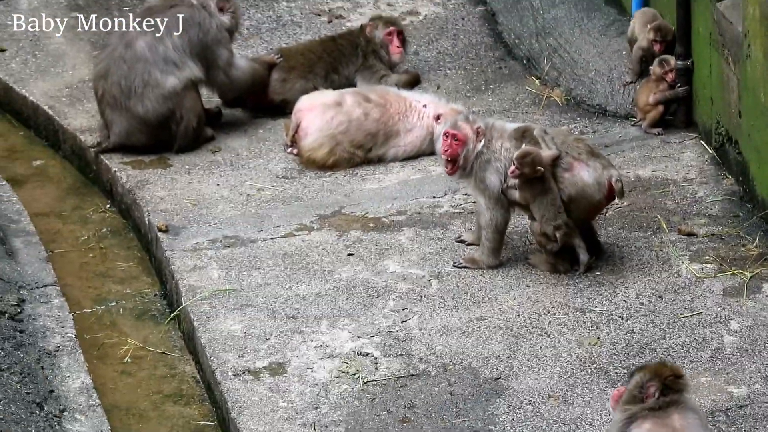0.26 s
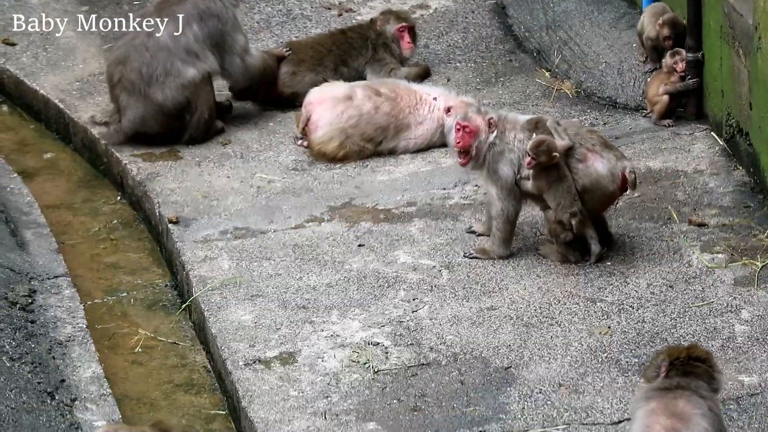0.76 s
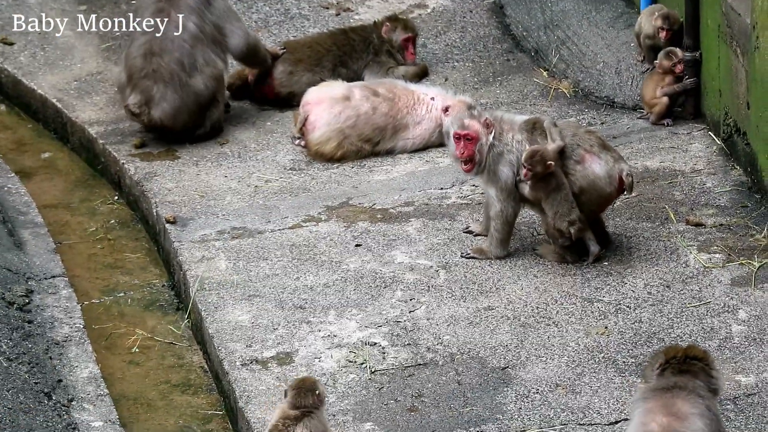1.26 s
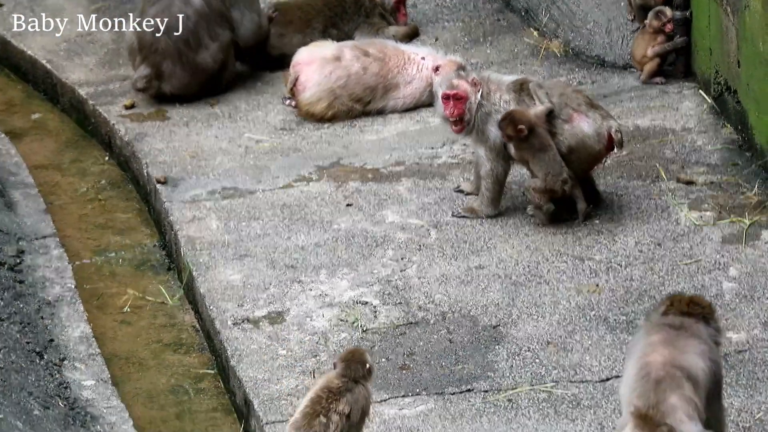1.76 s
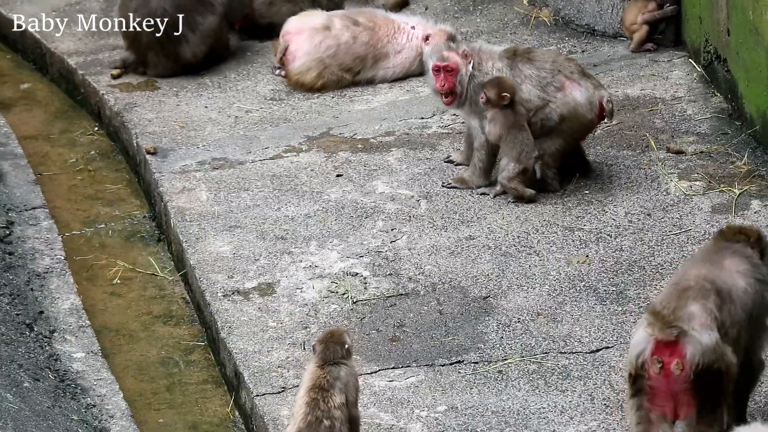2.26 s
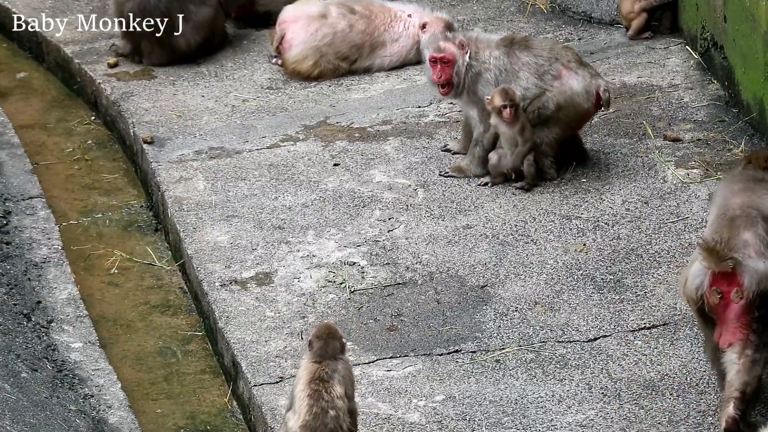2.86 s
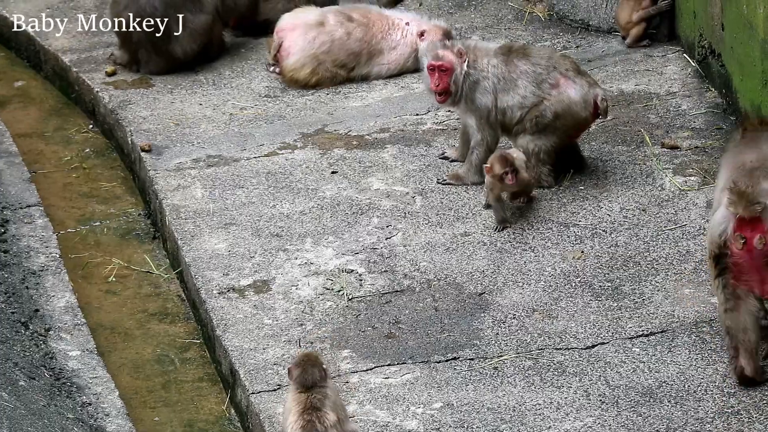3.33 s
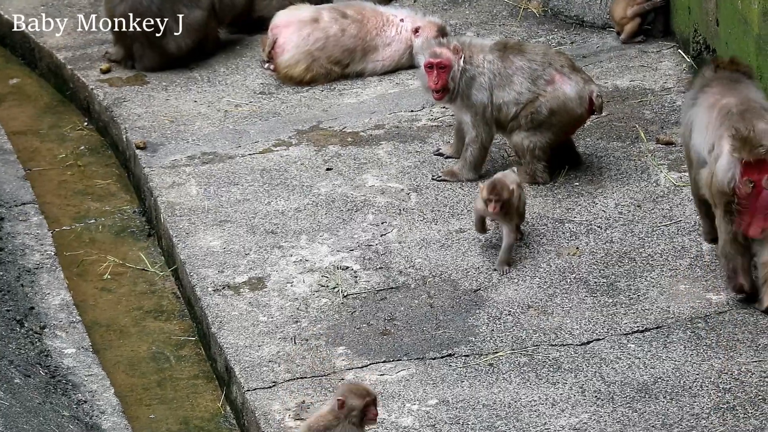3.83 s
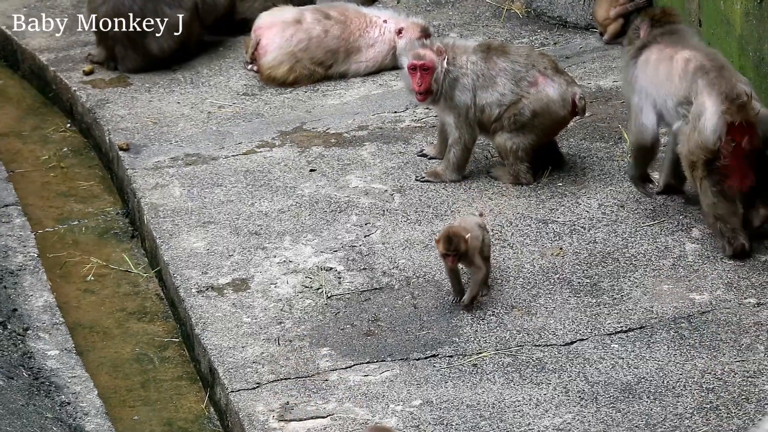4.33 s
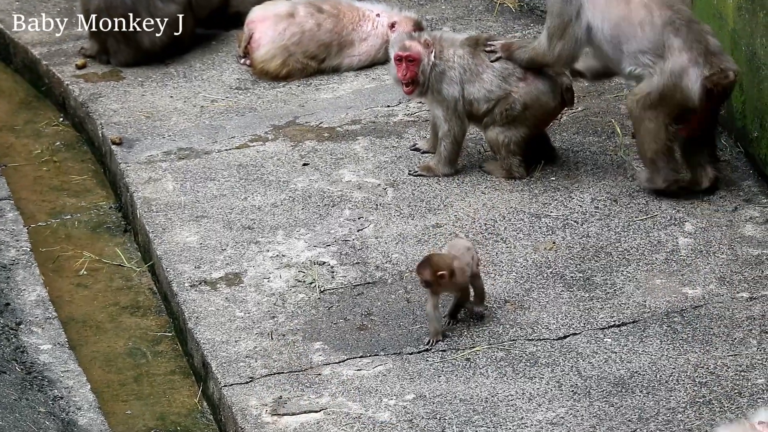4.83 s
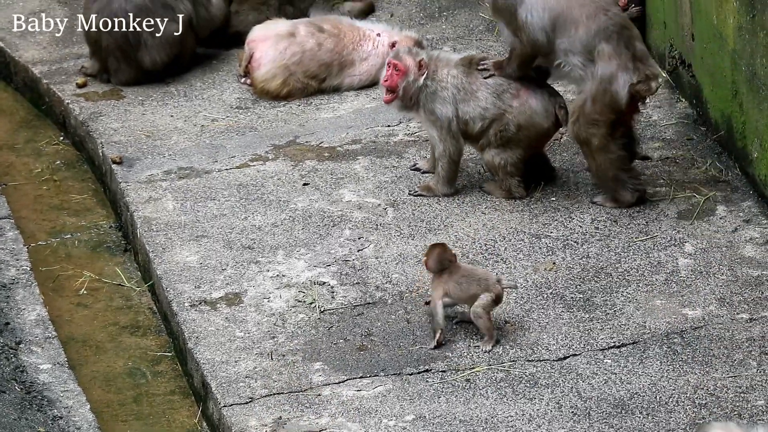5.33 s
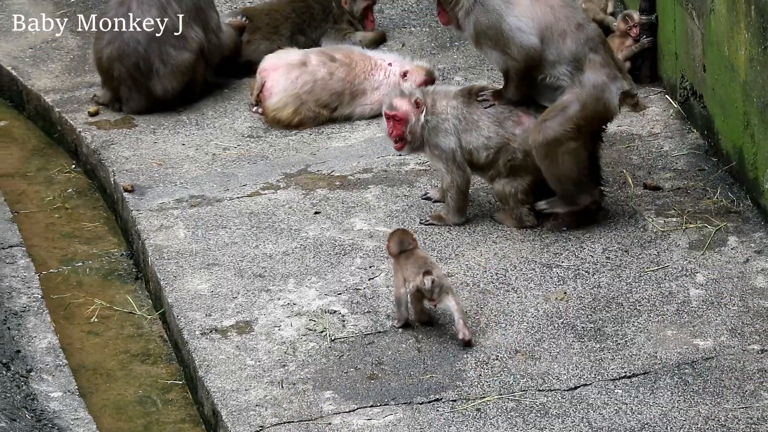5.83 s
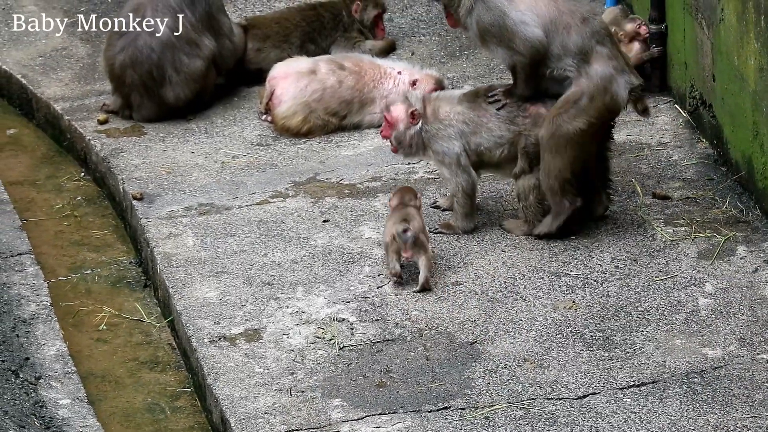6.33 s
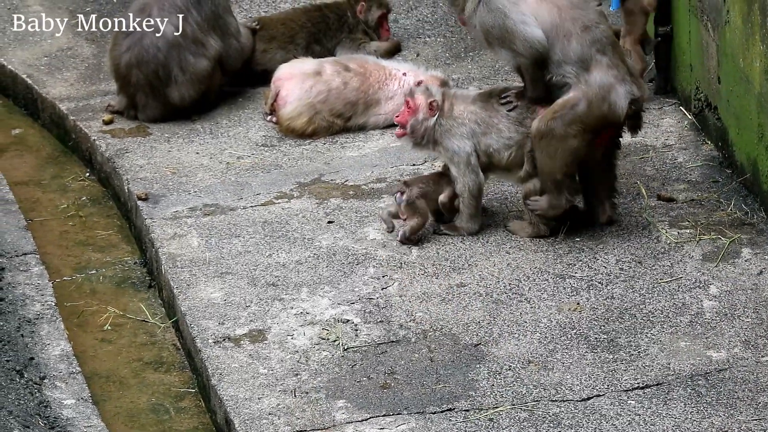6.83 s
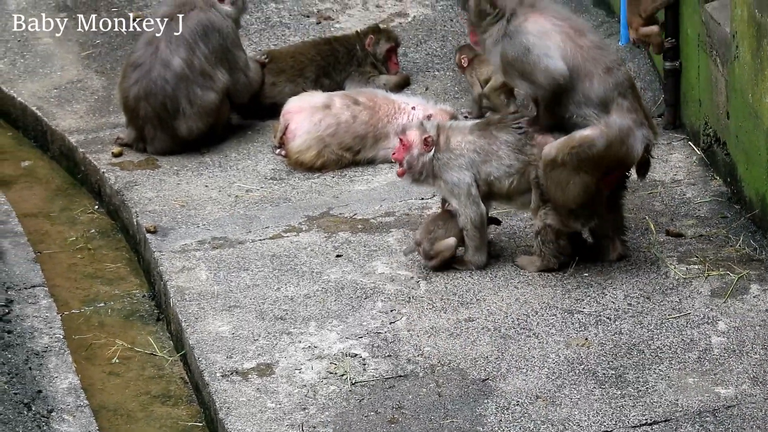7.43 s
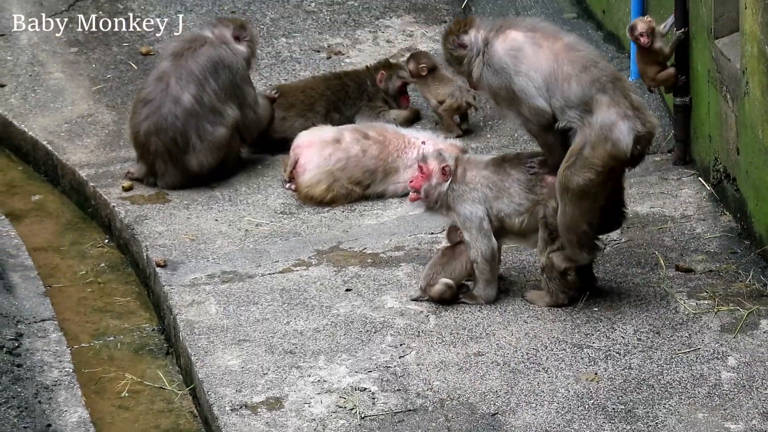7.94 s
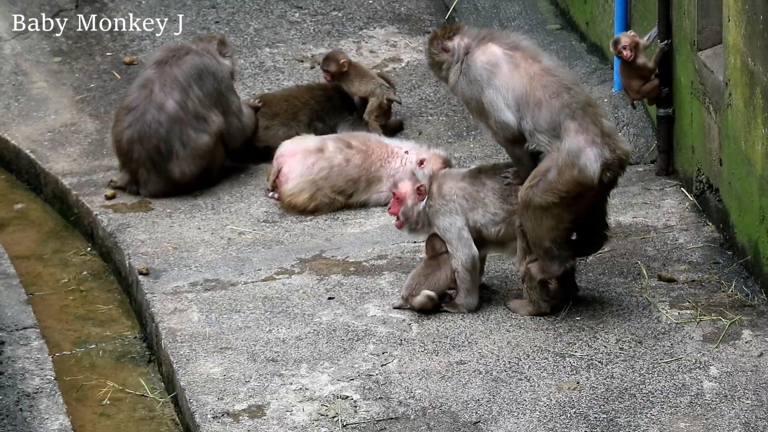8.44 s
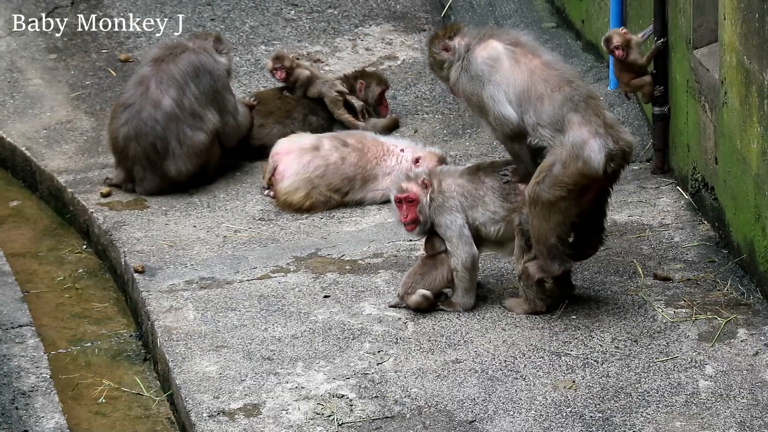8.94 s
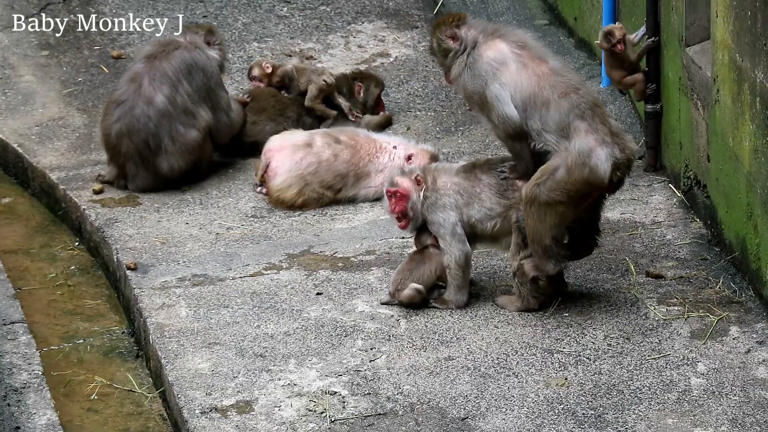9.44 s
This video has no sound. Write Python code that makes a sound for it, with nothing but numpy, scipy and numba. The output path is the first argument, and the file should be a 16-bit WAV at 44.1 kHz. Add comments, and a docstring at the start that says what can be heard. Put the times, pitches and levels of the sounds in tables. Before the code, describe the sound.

A monkey gives two long, breathy screams while a young one squeals thinly over them. After a pause with faint bird peeps, another monkey wails twice, then barks in short rough bursts until the end. Cicadas hiss steadily behind, with faint far coos and low wind. The calls are heard in stereo from the rim of an outdoor concrete pit, with a short echo off the walls.

```python
"""A concrete pit with macaques, heard from the rim through a pair of microphones.
One screams twice while a young one squeals over it; another wails, then barks in short rough bursts.
Screams, wails and barks are vocal-fold pulses and breath ringing in the chest, throat and mouth;
the squeals are thin, wavering tones. The walls give a short echo. Behind them are far coos, peeping
birds, scuffing feet, cicadas hissing in the trees, low wind and a machine humming far off."""
import sys
import numpy as np
from scipy import signal
from scipy.fft import rfft, irfft
from scipy.io import wavfile
from scipy.ndimage import uniform_filter1d
from numba import njit

SR = 44100
rng = np.random.default_rng(int(sys.argv[2]) if len(sys.argv) > 2 else 0)


def wav_record(signal):
    """Record a signal, one row per channel, as 16-bit PCM in the file named by sys.argv[1]."""
    frames = np.transpose(np.atleast_2d(signal))
    bounded = np.clip(frames, -1, 1)
    # unit amplitude maps onto the largest positive 16-bit level
    quanta = np.round(bounded * 32767).astype(np.int16)
    wavfile.write(sys.argv[1], SR, quanta)


N = 427319
T = np.arange(N) / SR

# One list per scream; the throat is relative to the mouth.
# (time [s], pitch [Hz], level [dB], mouth resonance [Hz], throat [dB])
SCREAM_SHAPES = [
    [(0.0, 284.7, -26.5, 1860, -44), (0.04, 284.4, -23.5, 1950, -26), (0.11, 292, -29, 1950, -21.5),
     (0.3, 297.2, -36, 1890, -17), (0.37, 316.8, -33, 1985, -21), (.52, 326.3, -39, 2000, -25),
     (.59, 335, -30, 1980, -32), (.68, 322.5, -38, 1950, -28), (0.712, 291.6, -30, 1910, -30),
     (.752, 292.5, -24.5, 1910, -24), (0.79, 275.7, -28, 1890, -18), (0.835, 260, -30, 1920, -11),
     (0.87, 198.5, -69, 1880, 9)],
    [(1.385, 305, -50, 1502, -8), (1.43, 319.3, -31, 1754, -33), (1.53, 324, -30, 1926, -25),
     (1.6, 312, -25.5, 1970, -28), (1.66, 309.6, -24.5, 1940, -21.5), (1.814, 291.7, -21.5, 1898, -22.5),
     (1.87, 286.7, -20.5, 1951, -23), (1.92, 278.4, -22, 1857, -25), (1.985, 266.4, -24, 1870, -11),
     (2.06, 180.5, -53.5, 1805, 3)],
]
# How raspy the screams are: (time [s], roughness [0-1])
SCREAM_RASP = [(0, .08), (.08, .1), (.12, .2), (.3, .16), (.36, .08), (.58, .07), (.63, .3), (.7, .25),
               (.72, .06), (.79, .1), (.86, .45), (1.4, .6), (1.55, .45), (1.6, .12), (1.68, .06),
               (1.93, .06), (1.97, .55)]
# Ringing gaps at the teeth: (centre [Hz], width [Hz], first scream [dB], second scream [dB])
SCREAM_GAPS = [(2630, 280, 1.5, 1.5), (3620, 170, 0.5, 2), (4670, 360, 5, 0.5), (5480, 540, -1.5, 7.5)]
# The teeth ring weaker in the second scream, the head turned another way: (teeth [dB], change with level [dB
# per dB])
SCREAM_TEETH_LEVELS = [(-8, -0.47), (-12, -0.13)]
def screams():
    """Two long, breathy screams; with effort, chest and teeth grow less than the mouth."""
    calls = [[(s, hz, db, mouth, throat, by_effort(db, -40, -1), by_effort(db, *lips), 0)
              for s, hz, db, mouth, throat in call] for call, lips in zip(SCREAM_SHAPES, SCREAM_TEETH_LEVELS)]
    before_second = T < SCREAM_SHAPES[1][0][0]
    gaps = [(hz, width, np.where(before_second, first, second))
            for hz, width, first, second in SCREAM_GAPS]
    return voice(calls, SCREAM_RASP, gaps, throat_hz=859, mouth_width_hz=282,
                 flutter=0.00459, wander=0.0393, jitter=0.1561, shimmer=0.3,
                 throb_db=3, breath_db=13, fill_db=-10.5, whoosh_db=-2.5)


# One list per call; the teeth are relative to the mouth.
# (time [s], pitch [Hz], level [dB], mouth resonance [Hz], teeth [dB])
WAIL_SHAPES = [
    [(4.675, 777, -40, 1470, -6), (4.693, 741, -20, 1540, -15), (4.703, 693, -22, 1580, -10),
     (4.719, 729, -20.5, 1550, -5.5), (4.733, 799, -14, 1640, -18), (4.749, 710, -24.5, 1550, -14),
     (4.759, 763, -18.5, 1540, -6.5), (4.772, 753, -18, 1580, -15), (4.783, 694, -23.5, 1570, -7),
     (4.797, 689, -19, 1580, -21), (4.803, 674, -30, 1500, -13), (4.822, 673, -46, 1450, -14)],
    [(5.035, 641.5, -29, 1732, -7), (5.061, 708, -27.5, 1730, -8), (5.081, 668, -24.5, 1712, -9),
     (5.101, 777.5, -29.5, 1560, 2), (5.123, 756, -36.5, 1590, 9.5), (5.155, 783, -38.5, 1710, 8.5),
     (5.18, 738, -35, 1750, 7), (5.207, 762, -39.5, 1730, 11), (5.215, 795, -28, 1750, -7),
     (5.226, 938, -23.5, 1840, -11), (5.245, 897, -25.5, 1800, -23), (5.267, 884, -29, 1702, -30),
     (5.285, 865, -38, 1348, -16), (5.295, 920, -41, 950, -14), (5.32, 876, -45.5, 901, -12)],
    [(7.391, 769, -23, 1619, -11), (7.403, 781, -16, 1644, -10.5), (7.418, 800, -18, 1692, -7.5),
     (7.431, 761, -19.5, 1610, -9.5), (7.44, 737, -27, 1595, -18)],
]
# How raspy the wails are: (time [s], roughness [0-1])
WAIL_RASP = [(4.66, .1), (4.735, .12), (4.75, .28), (4.83, .4), (5.03, .22), (5.055, .2), (5.065, .4),
             (5.08, .15), (5.1, .12), (5.21, .13), (5.23, .3), (5.25, .45), (5.33, .3), (7.39, .25),
             (7.44, .35)]
# Ringing gaps at the teeth: (centre [Hz], width [Hz], level [dB])
WAIL_GAPS = [(2360, 320, 2.5), (3090, 490, -19), (3840, 520, 11.5), (4600, 150, 8), (5400, 670, 2.5)]
# How bright the teeth sound in each call: (tilt [dB per octave])
WAIL_BRIGHTNESS = [-3.5, 4, -9]
def wails():
    """Two high wails and a yelp from fast, unevenly beating vocal folds."""
    calls = [[(s, hz, db, mouth, by_effort(db, -14.5, -0.05), by_effort(db, -42.5, -2.5), teeth, tilt)
              for s, hz, db, mouth, teeth in call] for call, tilt in zip(WAIL_SHAPES, WAIL_BRIGHTNESS)]
    return voice(calls, WAIL_RASP, WAIL_GAPS, throat_hz=795, mouth_width_hz=397,
                 flutter=0.005, wander=0.03, jitter=0.33, shimmer=1,
                 throb_db=1.5, breath_db=10, fill_db=-11, whoosh_db=-30)


# One row per bark: (start [s], swell [s], held [s], first level [dB], last level [dB],
# mouth resonance [Hz], throat [dB], final chest [dB], teeth [dB], teeth tilt [dB per octave])
BARK_SHAPES = [(5.671, 0.0041, 0.078, -24.5, -24, 1687, -8, -27, -4, 23),
               (5.987, 0.0037, 0.039, -20.5, -21, 1650, -9.5, -53, -6, 2),
               (6.033, .0015, 0.043, -18, -20, 1750, -8, -27, -6.5, -6),
               (6.078, 0.0034, 0.038, -23.5, -29, 1560, -6.5, -10, -5.5, -7),
               (6.330, 0.003, 0.03, -23, -26, 1740, -8.5, -18, -2.5, -7),
               (6.379, 0.002, .068, -21.5, -24.5, 1690, -11, -8.5, -9, -11),
               (6.732, 0.004, 0.034, -34, -36, 1780, -5.5, -10, -8, -3),
               (7.111, 0.004, 0.07, -22, -23.5, 1730, -12, -16, -13, 3),
               (7.436, 0.004, 0.056, -20, -26, 1630, -8, -26, -7.5, -6),
               (7.713, 0.0015, 0.068, -23.5, -26, 1644, -12, -17.5, -12.5, 3),
               (8.174, 0.002, 0.058, -26, -22, 1618, -10.5, -15.5, -10, 2),
               (8.457, 0.022, 0.078, -19.5, -27.5, 1676, -7, -6.5, -6.5, -3),
               (9.533, 0.0037, 0.063, -21.5, -23, 1509, -8, -14, -6.5, -3)]
# How raspy the barks are: (time [s], roughness [0-1])
BARK_RASP = [(6.3, .36), (6.4, .31)]
# Ringing gaps at the teeth: (centre [Hz], width [Hz], level [dB])
BARK_GAPS = [(2520, 220, 5.5), (3100, 330, -2.9), (3940, 400, 3), (4236, 330, 3)]
def barks():
    """The jaws snap open, then the mouth closes and the throat comes up. A new bark cuts off the last."""
    bite_s, bite_db, release_s, tense_hz = 0.018, 3, 0.03, 298.9
    next_starts = [bark[0] for bark in BARK_SHAPES[1:]] + [T[-1]]
    calls = []
    for bark, cut in zip(BARK_SHAPES, next_starts):
        s, swell, held, first, last, mouth, throat, chest, teeth, tilt = bark
        opened = (mouth, throat - 1.5, -29, teeth, tilt)  # the chest starts faint
        closed = (mouth * 0.86, throat + 1.5, chest, teeth - 4, tilt)
        stages, *columns = np.transpose([
            (s, first - 5, *opened),
            (s + swell, first, *opened),
            (min(s + held, cut), last, *closed),
            (min(s + held + release_s, cut), last - 19, *closed)])
        times = np.sort(np.append(stages, s + bite_s))
        db, *body, teeth_db, tilt_db = (np.interp(times, stages, c) for c in columns)
        teeth_db += bite_db * np.maximum(1 - (times - s) / bite_s, 0)  # the teeth flare at the snap
        hz = tense_hz * undb(0.15 * np.minimum(db + 27, 0))  # the folds slacken below -27 dB
        calls.append(np.transpose([times, hz, db, *body, teeth_db, tilt_db]))
    return voice(calls, BARK_RASP, BARK_GAPS, throat_hz=837, mouth_width_hz=322,
                 flutter=0.01, wander=0.1, jitter=0.3, shimmer=0.86,
                 throb_db=2.5, breath_db=5, fill_db=-9, whoosh_db=3)


def by_effort(db, base_db, slope):
    """A strength that is base_db when the call is at -27 dB and shifts by slope for each dB more."""
    return base_db + slope * (db + 27)


def voice(calls, rasp, gaps, throat_hz, mouth_width_hz, flutter, wander, jitter, shimmer,
          throb_db, breath_db, fill_db, whoosh_db):
    """Vocal-fold pulses and rushing breath ring in the mouth, throat, chest and gaps at the teeth."""
    (hz, db, mouth_hz, throat_db, chest_db, teeth_db, tilt_db), gate = follow(calls)
    rough = np.interp(T, *np.transpose(rasp))
    hz = hz * (1 + (flutter + wander * rough) * drift(70))  # tense folds never hold a pitch
    chance = rng.standard_normal((N // 30, 2))
    pulses = even(vocal_folds(hz, jitter * rough ** 2, shimmer * rough, chance))
    air = pulses + rough * undb(breath_db) * rng.standard_normal(N)
    mouth = even(band_pass(ring(air, mouth_hz, mouth_width_hz), mouth_hz, 2.83 * mouth_width_hz))
    throat = undb(throat_db) * even(ring(air, throat_hz * (1 + 0.12 * rough * drift(25)), width_hz=111))
    chest = undb(chest_db) * even(ring(air, np.clip(hz, 150, 300), width_hz=196))
    jet = air + undb(whoosh_db) * rng.standard_normal(N)  # air hisses past the teeth
    gap_rings = sum((-1) ** k * undb(gap_db + tilt_db * np.log2(centre / 3500)) * ring(jet, centre, width)
                    for k, (centre, width, gap_db) in enumerate(gaps))
    teeth = undb(teeth_db) * even(gap_rings)
    fill = undb(fill_db) * even(ring(jet, 2330, width_hz=1470))  # between the resonances
    loudness = undb(db + throb_db * np.sqrt(rough) * drift(110))
    return (mouth - throat + chest - teeth + fill) * loudness * gate


@njit
def vocal_folds(hz, jitter, shimmer, chance):
    """A pulse each time the folds close; jitter varies the spacing and shimmer the size."""
    pulses, phase, cycle = np.zeros(len(hz) + 1), 0., 0
    for i in range(len(hz)):
        step = hz[i] * np.exp(jitter[i] * chance[cycle, 0]) / SR
        phase += step
        if phase >= 1:
            phase, cycle = phase - 1, cycle + 1
            size = np.exp(shimmer[i] * chance[cycle, 1])
            pulses[i] += size * phase / step  # shared between two samples
            pulses[i + 1] += size * (1 - phase / step)
    return pulses[:-1]


# The young one's notes: (start [s], swell [s], loud until [s after start], length [s],
# first pitch [Hz], last pitch [Hz], level [dB], hoarse air [dB], split [0-1])
SQUEAL_NOTES = [(0.48, 0.024, 0.039, 0.04, 2600, 2580, -27.5, -35, 0.86),
                (.518, .006, 0.03, 0.028, 2982, 2876, -30.5, -43, .6),
                (.548, 0.009, 0.04, 0.036, 2900, 2970, -28, -34, 0.64),
                (0.591, .006, 0.038, 0.0374, 2776, 2760, -19, -45, 0.18),
                (0.632, 0.011, 0.044, 0.0637, 2844, 2735, -23, -41, 0.24),
                (1.614, 0.022, 0.046, 0.039, 2900, 3064, -31, -38, 0.85),
                (1.662, .008, 0.043, 0.046, 2975, 3112, -21.5, -46, 0.17),
                (1.708, 0.0055, 0.05, .048, 3078, 3000, -31, -41, .9),
                (1.754, 0.0054, 0.038, 0.041, 2950, 2810, -25, -52, 0.22),
                (2.484, .004, 0.025, .026, 2715, 2732, -26.5, -48, 0.04),
                (2.509, .012, .022, .045, 2800, 3010, -24.5, -58, .05),
                (2.552, .005, 0.053, 0.054, 3400, 3380, -37, -39, 0.84),
                (2.603, .012, 0.025, 0.085, 3074, 3070, -25.5, -47, 0.02),
                (2.701, 0.0068, .042, 0.044, 2900, 2816, -29, -52, .05)]
def squeals():
    """Each note glides, swells, holds and dies; its hoarse air swells and fades more gently."""
    notes = []
    for s, swell, loud, length, first_hz, last_hz, db, air, split in SQUEAL_NOTES:
        stages = (0, -6, -1), (swell, 0, 0), (loud, 0, 0), (length, -13, -9)
        notes.append([(s + at, first_hz + (last_hz - first_hz) * at / length,
                       db + tone_db, air + air_db - db - tone_db, split)
                      for at, tone_db, air_db in stages])
    return whistle(notes, waver=0.01126, throb_db=1, blur_hz=220, blur=0.5)


# One list per squeak: (time [s], pitch [Hz], level [dB])
SQUEAK_NOTES = [
    [(.465, 4060, -33), (.475, 3900, -34), (.5, 3500, -43), (.515, 3550, -46)],
    [(.546, 3740, -39), (.575, 3690, -30), (.6, 3600, -45)],
    [(2.55, 3810, -33), (2.57, 3740, -47), (2.585, 3770, -52)],
    [(2.635, 4240, -43), (2.685, 4290, -41.5), (2.695, 3894, -42), (2.712, 3320, -38)],
]
def squeaks():
    """Thin, throbbing tones above the young one's squeals."""
    return whistle(SQUEAK_NOTES, waver=0.0047, throb_db=5.5, blur_hz=120, blur=0.29)


def whistle(calls, waver, throb_db, blur_hz, blur):
    """A wavering tone blurred by narrow noise; in a squeal a slow flap of the folds adds side tones."""
    (hz, db, *squeal), gate = follow(calls)
    tone = sine(hz * (1 + waver * drift(200)))
    tone += blur * unit(ring(rng.standard_normal(N), hz, blur_hz))
    if squeal:
        hoarse_db, split = squeal
        flap = sine(hz=290 * (1 + 0.155 * drift(60)))
        hoarse = undb(hoarse_db) * unit(ring(rng.standard_normal(N), 3560, width_hz=1400))
        tone = tone * (1 + 1.06 * split * flap) + hoarse
    return tone * undb(db + throb_db * drift(120)) * gate


# The echo off the kerb: (left delay [s], right delay [s], level [dB])
KERB_ECHOES = [(.0042, .0031, -11)]
def kerb(x):
    """One quick bounce that reaches each microphone at its own time."""
    return sum(undb(db) * np.array([np.roll(x, int(left_s * SR)), np.roll(x, int(right_s * SR))])
               for left_s, right_s, db in KERB_ECHOES)


def scatter(x, length_s=0.0092, db=-11):
    """Bodies and rock throw the treble unevenly to the two sides in a quick cluster of echoes."""
    samples = np.arange(int(length_s * SR))
    cluster = rng.standard_normal(SR)[samples] * np.exp(-3 * samples / len(samples))
    treble = ring(x, 3200, width_hz=2000)
    side = signal.fftconvolve(treble, cluster / np.linalg.norm(cluster))[:N]
    return undb(db) * np.array([side, -side])


def pit_walls(x, fade_s=1, gap_s=0.027, db=-16):
    """Concrete walls return a dense, dull tail that falls 60 dB in fade_s, different on each side."""
    t = np.arange(SR) / SR
    tail = rng.standard_normal((2, SR)) * 1000. ** (-t / fade_s) * (t > gap_s)
    dull = band_pass(x, np.full(N, 1610.), width_hz=3500.)
    return undb(db) * signal.fftconvolve(dull[None], unit(tail) / np.sqrt(SR), axes=1)[:, :N]


# One list per coo: (time [s], pitch [Hz], level [dB])
COO_NOTES = [
    [(2.74, 420, -55.5), (2.93, 401, -58)],
    [(6.51, 900, -54), (6.525, 923, -48), (6.54, 905, -54)],
    [(9.05, 862, -59.5), (9.426, 981, -53), (9.52, 900, -57)],
    [(9.61, 1230, -54), (9.655, 1080, -46), (9.69, 1170, -48)],
]
def coos():
    """Soft far-off calls, more breath than tone."""
    return whistle(COO_NOTES, waver=0.0168, throb_db=-1, blur_hz=220, blur=1.52)


# Small birds: (time [s], level [dB], pitch [Hz])
BIRD_PEEPS = [(2.198, -43, 4100), (3.6994, -41, 2610), (4.0058, -38, 2230), (4.1935, -37, 2280),
              (7.3329, -41.5, 2290), (7.9436, -38.5, 2260), (8.559, -41, 2170), (9.0118, -44, 2140)]
def birds(chirp_count=110):
    """Short scratchy peeps over a scatter of far-off chirps."""
    when, pitch, size = rng.random((chirp_count, 3)).T
    chirps = zip(when * T[-1], -54 + 6 * size, 1900 + 1500 * pitch)
    peeps = scratches(BIRD_PEEPS, length_s=0.036, width_hz=120)
    return peeps + scratches(chirps, length_s=0.05, width_hz=340)


# Footfalls: (time [s], level [dB])
FOOT_SCUFFS = [(2.728, -39), (3.722, -44), (4.555, -41)]
def feet():
    """Feet scuff briefly on concrete."""
    return scratches([(s, db, 2900) for s, db in FOOT_SCUFFS], length_s=0.032, width_hz=1900)


# The cicadas' hiss up to about 10 kHz, plus a separate, very faint high hiss at 13-15 kHz:
# (frequency [Hz], relative level [dB])
TREBLE_COLOUR = [(4300, -50), (5000, -48), (5800, -13.5), (6800, -1.5), (8300, 2), (9000, -1), (9600, -12),
                 (10300, -16), (10500, -42.5), (12600, -46.5), (13500, -28), (14500, -41), (15100, -53)]
# How they swell: (time [s], level of both hisses [dB], lower cicada chorus against that level [dB])
TREBLE_LEVELS = [(0, -33, -8.5), (.9, -35.5, -14.5), (5, -36.5, -12.5), (9.69, -38, -0.5)]
def cicadas_and_faint_hiss():
    """Cicadas hiss up to about 10 kHz, a lower chorus growing late; a separate faint hiss lies above."""
    (treble_db, low_db), _ = follow([TREBLE_LEVELS])
    treble = hiss(TREBLE_COLOUR) * undb(treble_db + 0.59 * drift(9.2))
    low_chorus = hiss([(5200, -2), (5900, 4.5), (6500, 5.5)]) * undb(treble_db + low_db)
    return treble + low_chorus


# The colour of the open air: (frequency [Hz], relative level [dB])
AIR_COLOUR = [(15, -44.5), (25, -58), (129, -14), (313, -7.5), (357, -4), (488, -8.5), (609, -7),
              (1650, -9), (2110, -5.5), (2870, -5.5), (3830, -7.5), (4680, -15), (5000, -12), (6500, -31),
              (11000, -120)]
def distant_wash(db=-42.5, pan_db=1.5):
    """A nearly steady wash of far-off noise, a little louder on the left."""
    return hiss(AIR_COLOUR) * undb(db + 0.5 * drift(6.3) + pan_db * np.array([[0.5], [-0.5]]))


# Gusts: (time [s], half width [s], rise above the calm [dB])
WIND_GUSTS = [(3.3, 0.34, 4.5), (6.0, 0.43, 6.5), (6.8, 0.32, 11.5), (8.801, 0.28, 8)]
def wind(calm_db=-66.5):
    """A low rumble that swells with each gust."""
    gust_db = sum(db * np.exp(-((T - s) / width) ** 2) for s, width, db in WIND_GUSTS)
    return hiss([(20, -23), (60, -2.5), (150, -7.5), (300, 1.5)]) * undb(calm_db + gust_db)


# The machine's tones: (pitch [Hz], level before the lift [dB])
HUM_TONES = [(301.5, -66), (360.7, -57), (549.1, -61.5), (602.9, -63.5)]
def machine(lift_db=3):
    """A far-off hum whose tones waver in level and slightly in pitch."""
    return sum(undb(db + lift_db + 2 * drift(10)) * sine(hz + 1.492 * drift(9)) for hz, db in HUM_TONES)


# How alike background noise is on the two sides: (frequency [Hz], likeness [-1 to 1])
SIDE_LIKENESS = [(30, 1), (300, 0.59), (1000, 0.1), (2500, -0.52), (5000, -0.32), (9000, -0.19)]
def hiss(colour):
    """Two-channel noise shaped by (frequency [Hz], level [dB]) rows, most alike in the bass."""
    log_hz = np.log(np.maximum(np.arange(N // 2 + 1) * SR / N, 1))
    colour_hz, db = np.transpose(colour)
    gain = undb(np.interp(log_hz, np.log(colour_hz), db, -120, -120))
    likeness_hz, likeness = np.transpose(SIDE_LIKENESS)
    alike = np.interp(log_hz, np.log(likeness_hz), likeness)
    mid, side = (irfft(rfft(rng.standard_normal(N)) * gain * np.sqrt(1 + sign * alike), N)
                 for sign in (1, -1))
    return unit(np.array([mid + side, mid - side]))


def scratches(rows, length_s, width_hz):
    """Short swells of filtered noise, one per (time [s], level [dB], pitch [Hz]) row."""
    out, swell = np.zeros(N + SR), np.hanning(int(length_s * SR))
    for s, db, hz in rows:
        i = int(max(s - 0.01, 0) * SR)
        scratch = ring(rng.standard_normal(4096), hz, width_hz)[1024:1024 + len(swell)]
        out[i:i + len(swell)] += undb(db) * swell * unit(scratch) / np.sqrt(2)
    return out[:N]


def follow(calls):
    """Turn the calls' columns into curves over time, with a gate that is open during each call."""
    times, *columns = np.vstack(calls).T
    gate = np.minimum(sum((T >= call[0][0]) & (T < call[-1][0]) for call in calls), 1.)
    quick_start = uniform_filter1d(gate, size=70)
    soft_end = uniform_filter1d(gate, size=600, origin=299)
    return [np.interp(T, times, c) for c in columns], np.maximum(quick_start, soft_end)


@njit
def band_pass(x, hz, width_hz):
    """Keep the sound near a moving centre frequency."""
    out, band, low = np.empty(len(x)), 0., 0.
    for i in range(len(x)):
        g, damping = np.tan(np.pi * hz[i] / SR), width_hz / hz[i]
        v = (band + g * (x[i] - low)) / (1 + g * (g + damping))
        band, low, out[i] = 2 * v - band, low + 2 * g * v, damping * v
    return out


def ring(x, hz, width_hz):
    """A steep resonance: two band-passes in a row."""
    hz = hz + np.zeros(len(x))
    return band_pass(band_pass(x, hz, 1.44 * width_hz), hz, 1.44 * width_hz)


def drift(per_second):
    """A smooth random wobble."""
    hold = int(SR / per_second)
    steps = np.repeat(rng.standard_normal(N // hold + 1), hold)
    return 1.3 * uniform_filter1d(uniform_filter1d(steps, hold), hold)[:N]


def sine(hz):
    """A pure tone with a moving pitch."""
    return np.sin(2 * np.pi * np.cumsum(hz) / SR)


def undb(db):
    """Decibels to gain."""
    return 10 ** (np.asarray(db) / 20)


def unit(x):
    """Scale to an average power of 1."""
    return x / np.sqrt(np.mean(x ** 2))


def even(x, span_s=0.031):
    """Hold the power near 1 from moment to moment."""
    return x / np.sqrt(uniform_filter1d(x ** 2, int(span_s * SR)) + 1e-12)


def scene():
    """The animals placed between left and right, their echoes, and the surroundings."""
    screamer = screams()
    barker = wails() + barks()
    young = squeals() + squeaks()
    far = coos() + birds() + feet()
    placed = [(screamer, 1), (young, 3), (barker, 1.5), (far, 10)]  # (sound, left minus right [dB])
    left, right = (sum(x * undb(sign * pan / 2) for x, pan in placed) for sign in (1, -1))
    direct = np.array([np.roll(left, 2), right])  # the left side lags by two samples
    animals = screamer + young + barker + far
    echoes = kerb(animals) + scatter(animals + undb(5) * young)
    # the screamer faces away from the walls, so less of it comes back; the young one faces them
    echoes += pit_walls(0.43 * screamer + 2.2 * young + barker + far)
    return direct + echoes + cicadas_and_faint_hiss() + distant_wash() + wind() + machine()


def record(dry):
    """The left microphone lifts the bass and the right loses as much; the highest treble is cut."""
    bass = undb(-7.5) / 2 * band_pass(dry.mean(axis=0), np.full(N, 260.), width_hz=340.)
    treble_cut = signal.ellip(8, 0.2, 70, 15100, fs=SR, output="sos")
    return signal.sosfilt(treble_cut, dry + np.array([bass, -bass]))


dry = scene()
out = record(dry)
wav_record(out)
```